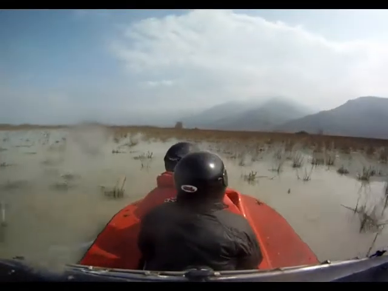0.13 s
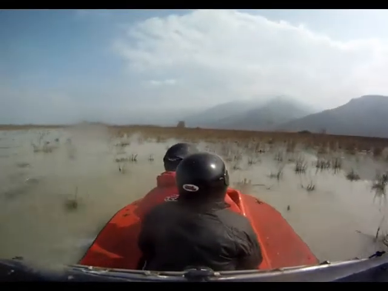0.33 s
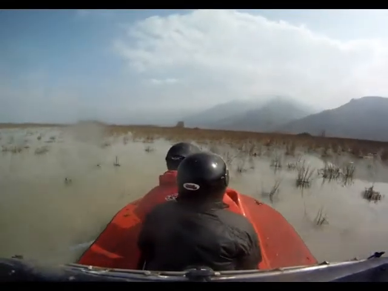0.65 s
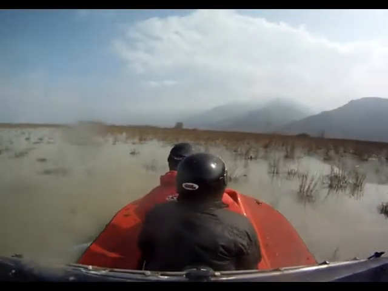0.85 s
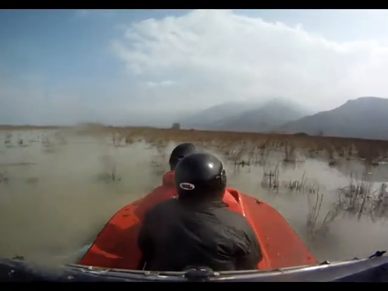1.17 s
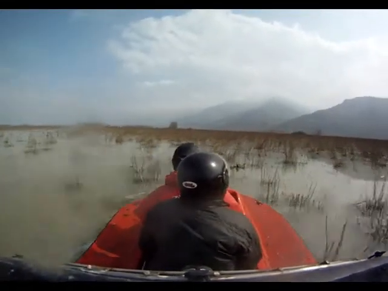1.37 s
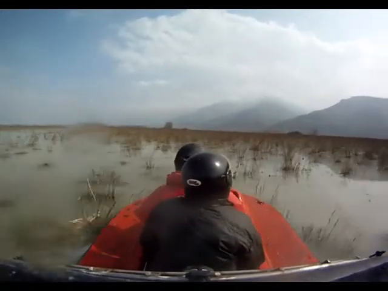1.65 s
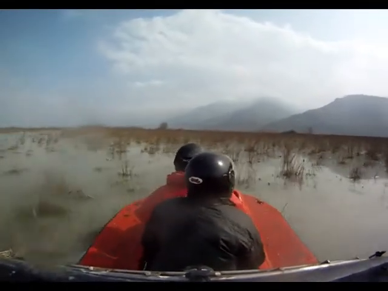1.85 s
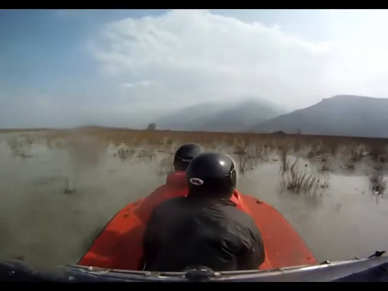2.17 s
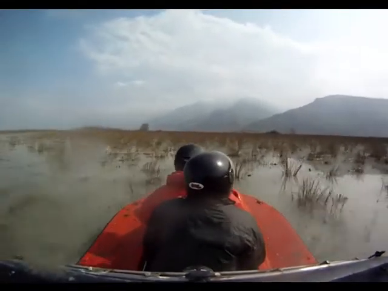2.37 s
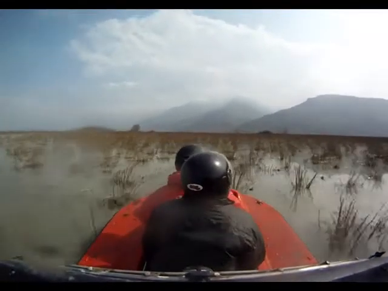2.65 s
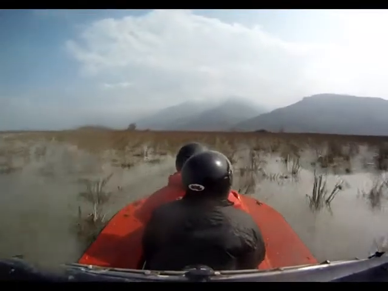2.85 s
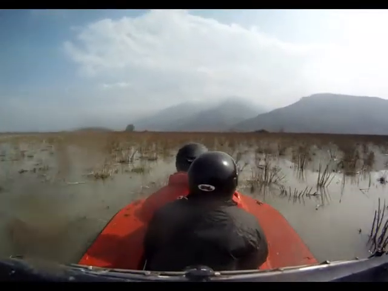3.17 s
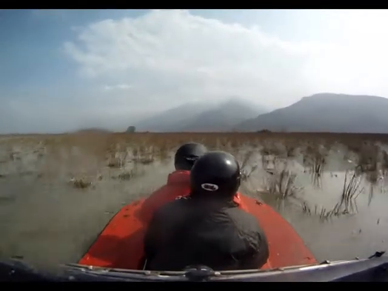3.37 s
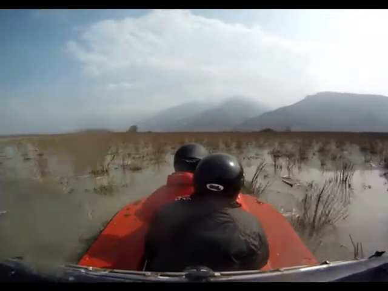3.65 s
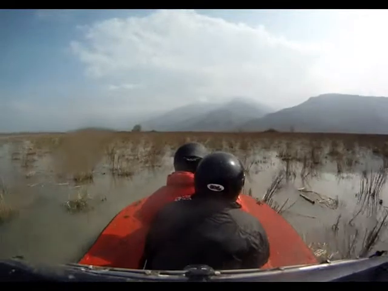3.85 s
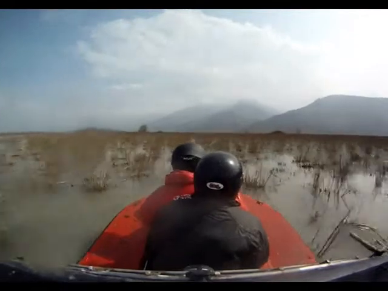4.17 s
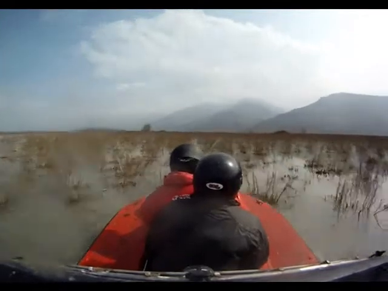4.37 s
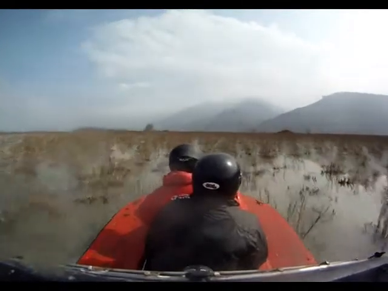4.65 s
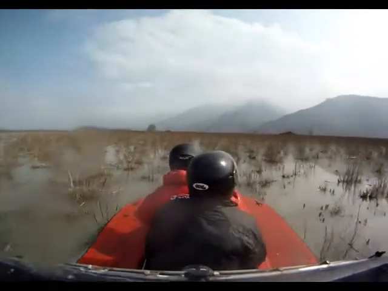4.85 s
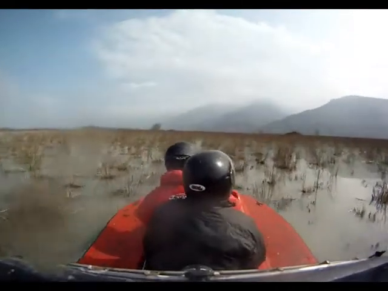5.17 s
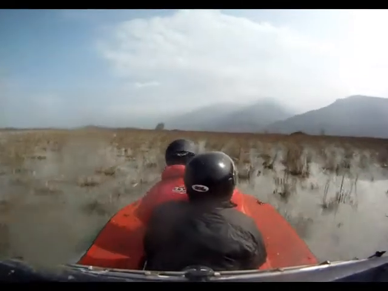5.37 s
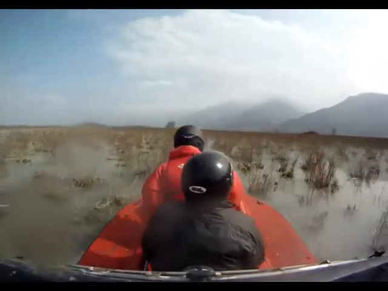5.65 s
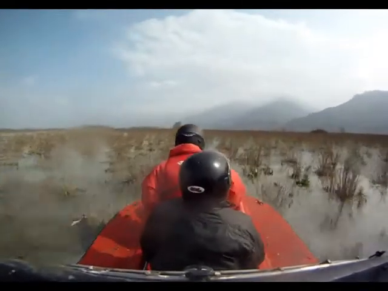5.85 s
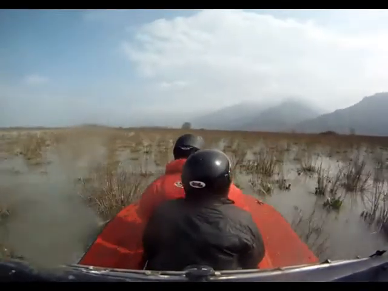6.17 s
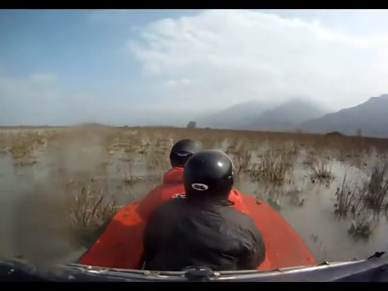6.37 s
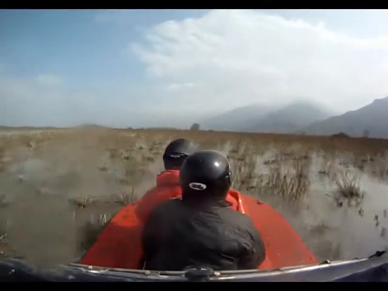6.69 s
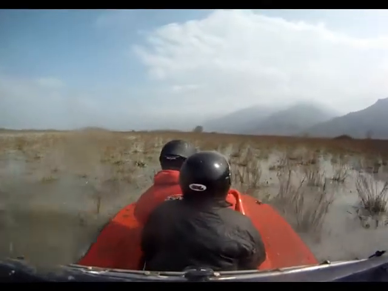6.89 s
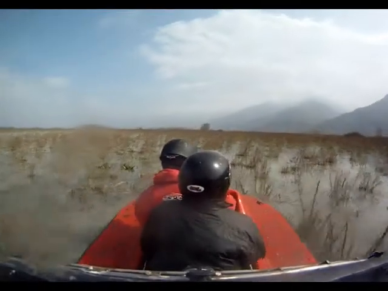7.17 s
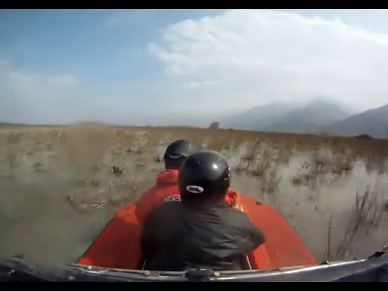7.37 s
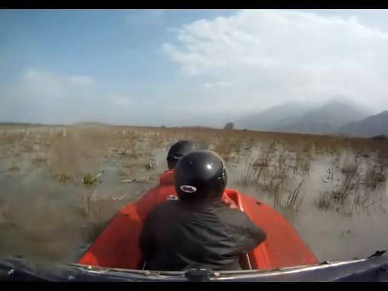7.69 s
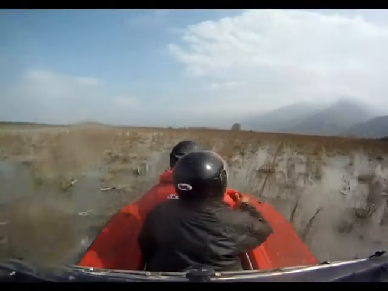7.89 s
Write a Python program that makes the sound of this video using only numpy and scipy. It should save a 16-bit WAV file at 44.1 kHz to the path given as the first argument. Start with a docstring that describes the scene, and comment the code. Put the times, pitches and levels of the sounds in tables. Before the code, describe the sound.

Aboard a small hovercraft skimming over flooded marsh, the microphone sits close ahead of the engine. From 0 to about 1.6 seconds the engine runs nearly flat out: a dense low drone near 72 firings a second, with buzzing overtones and a hoarse, hard-edged exhaust rasp. A geared fan adds a slow beating and a lumpy roar of air. From 1.6 to 2.5 seconds the pitch slides down by a couple of semitones and the rasp dulls. It stays eased, rounder and softer until about 4.5, with short dull hull knocks near 2.3, 2.5, 3.1 and 3.4 and a very faint patter of reeds and spray. Between 4.5 and 5.4 it surges back up, the exhaust suddenly biting again. It peaks harshly around 6.2, then sinks very slightly until 8, still roaring. Everything is dry and continuous, with thin treble fizz and grit.

```python
"""Flooded marsh, on board a small skimming hovercraft, just ahead of the engine.
The engine runs hard, eases off for three seconds and opens up again, all its tones sliding with its speed.
Near full speed the exhaust comes on the pipe and rasps; the geared fan beats slowly against it in a roar of air.
Tones are stacked on one crank, gas and air are shaped noise, and hull knocks are short decaying rings.
Coarse sampling adds a thin mirrored fizz and a faint treble grit."""
import sys
import numpy as np
from scipy import signal
from scipy.fft import rfft, irfft
from scipy.io import wavfile
from scipy.ndimage import uniform_filter1d

SR = 44100
rng = np.random.default_rng(int(sys.argv[2]) if len(sys.argv) > 2 else 0)


def store_wav(level_fs):
    """Save 16-bit WAV to argv[1]."""
    pcm = np.round(np.clip(np.atleast_2d(level_fs), -1, 1) * 32767)
    wavfile.write(sys.argv[1], SR, pcm.T.astype(np.int16))


N = 354123
TIME = np.arange(N) / SR
HZ = np.fft.rfftfreq(N, 1 / SR)

# engine speed over time: time_s, firing_rate_hz
ENGINE_SPEED = [(0.0, 72.5), (0.19, 72.33), (0.73, 72.59), (1.43, 73.01), (1.64, 72.23), (1.92, 68.41),
                (2.13, 65.99), (2.49, 63.75), (3.13, 63.16), (3.37, 62.37), (4.3, 62.54), (4.5, 63.34),
                (4.91, 68.3), (5.13, 70.68), (5.37, 72.2), (5.73, 72.97), (6.17, 73.36), (6.5, 73.21),
                (7.07, 72.15), (8.03, 71.3)]
# firing rates: eased, at the pipe's weak lower resonance, where it comes on the pipe, and flat out
EASED_HZ, HALF_PIPE_HZ, ON_PIPE_HZ, FULL_HZ = 62.5, 65.7, 71.35, 73

# the deep tone at the firing rate itself: time_s, level_db
THRUM = [(0.06, -20.5), (1.69, -20), (1.95, -23), (2.43, -19), (4.43, -17.5), (5.0, -24), (6.67, -19.5),
         (6.8, -22), (7.95, -23)]
# the loudest tones above it: order (multiple of the firing rate)
# 3.49 is the blade rate of the geared fan, whose octave beats slowly against the engine's seventh order
DRONE_ORDERS = (2, 3, 3.4898, 4, 6.9796, 7)
# engine speeds at which the drone levels are given: firing_rate_hz
DRONE_SPEEDS = (62.5, 65, 68.5, 71, 73)
# one row per drone order, one column per drone speed: level_db
DRONE_LEVELS = [(-23, -22.6, -19, -20.5, -21), (-31, -28.5, -32, -29.5, -29.5),
                (-23.5, -20.5, -25.5, -22.3, -23.5), (-30, -39, -29.5, -25.5, -31),
                (-48, -43, -55, -45.5, -36.5), (-60, -42, -30, -31, -27)]

# how pipe and hull pass the weaker engine tones: pitch_hz, open_db, eased_db
OVERTONE_RESPONSE = [(100, -31, -39), (180, -39, -37), (361, -44.5, -43.5), (404, -29.5, -41),
                     (603, -38.5, -46.5), (650, -34, -42), (666, -30.5, -37.5), (784, -32.5, -38),
                     (862, -42.5, -46), (980, -30, -44.5), (1174, -40.5, -48), (1260, -64, -50),
                     (1412, -36.5, -49), (1473, -45, -51.5), (1690, -30.5, -45.5), (1815, -33.5, -48),
                     (2110, -46.5, -59), (2193, -44.5, -52.5), (2344, -41.5, -50), (2503, -68, -63),
                     (2600, -39.5, -46), (2680, -46.5, -62)]
# the weaker tones lie on whole orders, and more faintly on the low half orders
WHOLE_ORDERS = [order for order in range(3, 40) if order not in DRONE_ORDERS]
HALF_ORDERS = [order + .5 for order in range(1, 15) if order != 3]
# overtones that sing out above their neighbours: order (multiple of the firing rate)
STRONG_ORDERS = (20, 22, 24, 26, 33, 35)
# duct resonances that light up whole orders sweeping through: centre_hz, half_width_hz, lift_db
DUCT_BOOMS = [(543.4, 18.6, 18), (2152, 52, 9)]

# gas surges in one firing cycle: place_turns, length_turns, strength (ratio to the steady flow)
GAS_SURGES = [(0.042, 0.097, 0.98), (0.288, 0.06, 1.33), (0.551, 0.074, 1.7)]
# colour of turbulent exhaust gas: frequency_hz, relative_density_db (per Hz)
RASP_COLOUR = [(60, -5), (150, -27), (360, -11), (550, -7), (1100, -6.5), (1300, -10), (1500, -6.5),
               (1850, -12), (2100, -20), (2700, -14), (3400, -26.5), (5200, -28), (5750, -17),
               (6000, -26.5)]
# resonances of pipe and engine bay: centre_hz, width_hz, lift_db
PIPE_RESONANCES = [(720, 110, 2), (996, 44, 8), (1784, 275, 12.5), (2265, 100, 17.5)]

# colour of air through the fan duct and from under the skirt: frequency_hz, relative_density_db (per Hz)
AIR_COLOUR = [(15, -19), (35, -6), (110, -6), (170, -1), (225, 5), (290, -2), (370, -10.5), (540, 1),
              (630, -13), (900, -14), (1300, -15), (2400, -27.5), (3200, -33), (6000, -37)]
# resonances of the fan duct: centre_hz, width_hz, lift_db
DUCT_RESONANCES = [(744, 75, 12), (1034, 200, 9.5), (2246, 100, 15), (3630, 170, 12.5)]

# knocks on the hull: start_s, blow_level_db
HULL_KNOCKS = [(2.302, -10), (2.536, -12), (3.118, -8), (3.438, -12)]
# colour of the tick in each knock: frequency_hz, relative_density_db (per Hz)
TICK_COLOUR = [(100, -1), (1000, 15), (2000, 2), (4800, -6), (6000, -20)]


def from_db(db):
    """Decibels to gain."""
    return 10 ** (np.asarray(db) / 20)


def unit(x):
    """Scales to rms 1."""
    return x / np.sqrt(np.mean(x ** 2) + 1e-20)


def curves(rows):
    """Draws each column of a time table as a curve over every sample."""
    times_s, *columns = np.transpose(rows)
    return [np.interp(TIME, times_s, column) for column in columns]


def colour(x, points, resonances=()):
    """Filters by a spectrum with resonant humps on top."""
    hz, db = np.transpose(points)
    level_db = np.interp(np.log(HZ + 1), np.log(hz), db)
    for centre, width, lift_db in resonances:
        level_db = level_db + lift_db / (1 + (2 * (HZ - centre) / width) ** 2)
    return irfft(rfft(x) * from_db(level_db), N)


def wander(rate_hz):
    """Random drift of rms 1, heading for a new value rate_hz times a second."""
    points = rng.standard_normal(4096)
    return unit(np.interp(TIME * rate_hz, np.arange(len(points)), points))


def exhaust_bite(speed, slope=0.55, half_pipe=0.16, half_width_hz=0.8,
                 on_pipe=0.45, onset_width_hz=0.23, pull=0.0052):
    """Exhaust bite (about 0 eased, 1 wide open) grows with speed and acceleration, jumping as the pipe tunes in."""
    acceleration = uniform_filter1d(np.gradient(speed) * SR, SR // 3)  # firings per second, per second
    rise = slope * (speed - EASED_HZ) / (FULL_HZ - EASED_HZ) + pull * acceleration
    swell = half_pipe * np.exp(-((speed - HALF_PIPE_HZ) / half_width_hz) ** 2)
    jump = on_pipe / (1 + np.exp((ON_PIPE_HZ - speed) / onset_width_hz))
    return rise + swell + jump


def crank_tone(turns, order, scatter_rad):
    """One order of the crank; the low orders pull together into a pressure dip at each firing."""
    lag = scatter_rad * order * rng.standard_normal()
    return -np.sqrt(2) * np.cos(2 * np.pi * order * turns + lag)


def drone(turns, speed, flutter_db=0.47, flutter_hz=35, drift_db=0.4, drift_hz=4):
    """Clean low exhaust and fan-blade tones follow engine speed; gusts shake the higher ones more."""
    levels_db = curves(THRUM)
    levels_db += [np.interp(speed, DRONE_SPEEDS, row) for row in DRONE_LEVELS]
    out = np.zeros(N)
    for order, level_db in zip((1, *DRONE_ORDERS), levels_db):
        gusts_db = flutter_db * wander(flutter_hz) + drift_db * wander(drift_hz)
        gain = from_db(level_db + np.sqrt(order) * gusts_db)
        out += gain * crank_tone(turns, order, scatter_rad=.06)
    return out


def gas_flow(turns):
    """Gas flow along the firing cycle: a steady stream with smooth surges at fixed crank positions."""
    flow = 1
    for place, length, strength in GAS_SURGES:
        distance = (turns - place + .5) % 1 - .5
        flow = flow + strength * np.exp(-(distance / length) ** 2)
    return flow


def surge_phases(orders, sizes, passes):
    """Phases that crowd tones of these orders and sizes into the gas surges, more so with each pass."""
    size = 512
    bins = np.round(2 * np.asarray(orders)).astype(int)
    # half orders make the pattern repeat every second firing
    weight = gas_flow(2 * np.arange(size) / size)
    ripple = rng.standard_normal(size)
    for _ in range(passes):
        phases = np.angle(rfft(ripple * weight))[bins]
        spectrum = np.zeros(size // 2 + 1, complex)
        spectrum[bins] = sizes * np.exp(1j * phases)
        ripple = irfft(spectrum)
    return phases


def overtones(turns, speed, bite, half_db=-8, strong_db=6,
              drift_db=1.0, drift_hz=5, flutter_db=1.16, flutter_hz=30):
    """Engine tones slide through fixed responses blended by bite; each drifts and flutters in the air stream."""
    hz, open_db, eased_db = np.transpose(OVERTONE_RESPONSE)
    orders = np.array(WHOLE_ORDERS + HALF_ORDERS)
    offsets_db = half_db * np.isin(orders, HALF_ORDERS) + strong_db * np.isin(orders, STRONG_ORDERS)
    sizes = from_db(np.interp(orders * FULL_HZ, hz, open_db) + offsets_db)
    phases = surge_phases(orders, sizes, passes=1)
    out = np.zeros(N)
    for order, offset_db, phase in zip(orders, offsets_db, phases):
        pitch = order * speed
        level_db = offset_db + bite * np.interp(pitch, hz, open_db)
        level_db += (1 - bite) * np.interp(pitch, hz, eased_db)
        level_db += drift_db * wander(drift_hz) + flutter_db * wander(flutter_hz)
        if order in WHOLE_ORDERS:
            for centre, half_width, lift_db in DUCT_BOOMS:
                level_db += lift_db * np.exp(-((pitch - centre) / half_width) ** 2)
        out += from_db(level_db) * np.cos(2 * np.pi * order * turns + phase)
    return np.sqrt(2) * out


def rasp(turns, speed, bite, open_db=-23.5, eased_db=-30.0, speed_power=3, buzz=0.83, strain_db=0.5):
    """Gas leaves the pipe in surges locked to the crank: turbulence, with a regular buzz at the top."""
    gas = unit(gas_flow(turns) * rng.standard_normal(N))
    orders = np.arange(40, 62)
    phases = surge_phases(orders, 1, passes=2)
    edge = sum(np.cos(2 * np.pi * order * turns + phase) for order, phase in zip(orders, phases))
    # buzz sets the strength of the lines against the gas between them
    gas = gas + buzz * edge * 2 * np.sqrt(turns[-1] / N)
    strength = from_db(eased_db + bite * (open_db - eased_db))
    strength *= (speed / speed.max()) ** speed_power
    # hoarser for each firing a second past the pipe's tune
    strength *= from_db(strain_db * np.maximum(speed - ON_PIPE_HZ, 0))
    return strength * unit(colour(gas, RASP_COLOUR, PIPE_RESONANCES))


def air(bite, level_db=-25.5, open_db=-2, gust_db=-0.1, gust_hz=45):
    """The fan's lumpy roar is gusting noise through duct resonances, a little softer as the bite grows."""
    stream = rng.standard_normal(N) * from_db(gust_db * wander(gust_hz))
    return from_db(level_db + open_db * bite) * unit(colour(stream, AIR_COLOUR, DUCT_RESONANCES))


def hull(t60_s=0.01, panel_hz=680, tick=0.23, patter_per_s=35, patter_db=-23):
    """Blows ring a damped hull panel: dull, short knocks among a light patter of reeds and spray."""
    hits = rng.random(N) < patter_per_s / SR
    blows = hits * rng.random(N) ** 2 * from_db(patter_db)
    for start_s, level_db in HULL_KNOCKS:
        blows[round(start_s * SR)] += from_db(level_db)
    t = TIME[:SR // 20]
    tick_noise = unit(colour(rng.standard_normal(N), TICK_COLOUR))[:len(t)]
    ring = -np.sin(2 * np.pi * panel_hz * t) + tick * tick_noise
    decay = np.exp(-np.log(1000) * t / t60_s)
    return signal.oaconvolve(blows, ring * decay)[:N]


def scene(jitter_turns=0.0006, jitter_hz=60, uneven_db=0.61, uneven_hz=45):
    """One crank drives every tone; its timing and the exhaust's strength waver from firing to firing."""
    speed, = curves(ENGINE_SPEED)
    bite = exhaust_bite(speed)
    turns = np.cumsum(speed) / SR + jitter_turns * wander(jitter_hz)  # one firing per turn
    firing = from_db(uneven_db * wander(uneven_hz))
    exhaust = firing * (overtones(turns, speed, bite) + rasp(turns, speed, bite))
    return (drone(turns, speed) + exhaust + air(bite) + hull())[None]


def record(dry, clock_hz=12000, edge_hz=15700, grit_db=-8.0, grit_hz=7600, grit_width_hz=1400):
    """Holding each sample of a slow clock mirrors the sound around the clock rate as a thin fizz."""
    spectrum = rfft(dry[0])
    clock_bin = round(clock_hz * N / SR)
    offset = (np.arange(len(HZ)) + clock_bin // 2) % clock_bin - clock_bin // 2
    image = spectrum[abs(offset)]
    mirrored = np.where(offset < 0, image.conj(), image)
    held = mirrored * np.sinc(HZ / clock_hz)
    # a faint treble grit rides on the steep parts of the wave
    grit = rfft(np.gradient(dry[0]) * rng.standard_normal(N))
    grit *= from_db(grit_db) / (1 + ((HZ - grit_hz) / grit_width_hz) ** 2)
    top_cut = np.sqrt(1 + (HZ / edge_hz) ** 600)  # a very steep treble edge
    return irfft((held + grit) / top_cut, N)[None]


dry = scene()
out = record(dry)
store_wav(out)
```